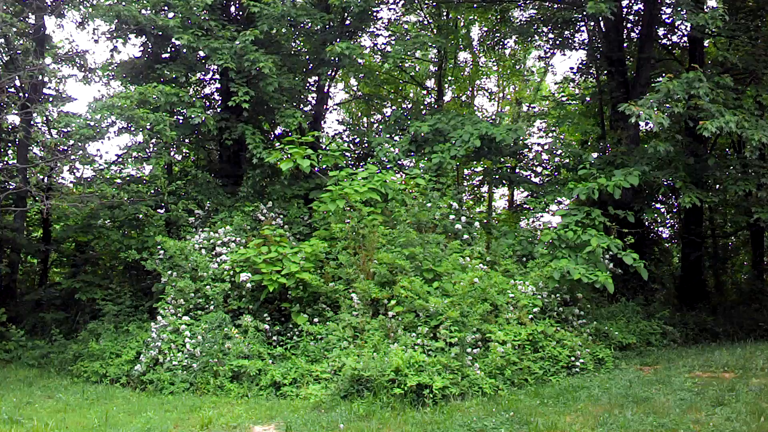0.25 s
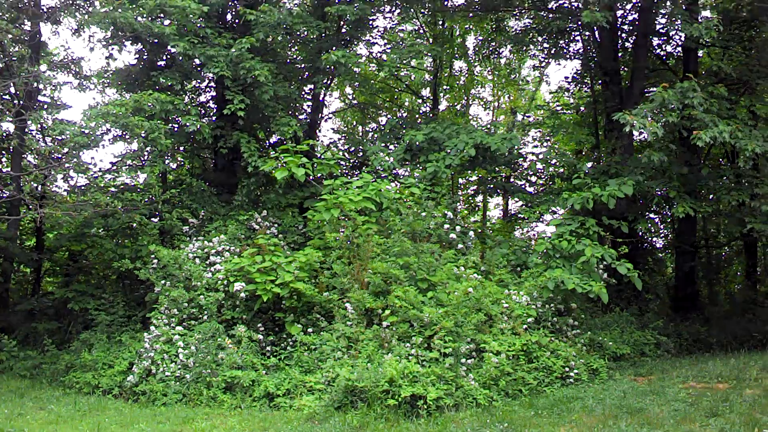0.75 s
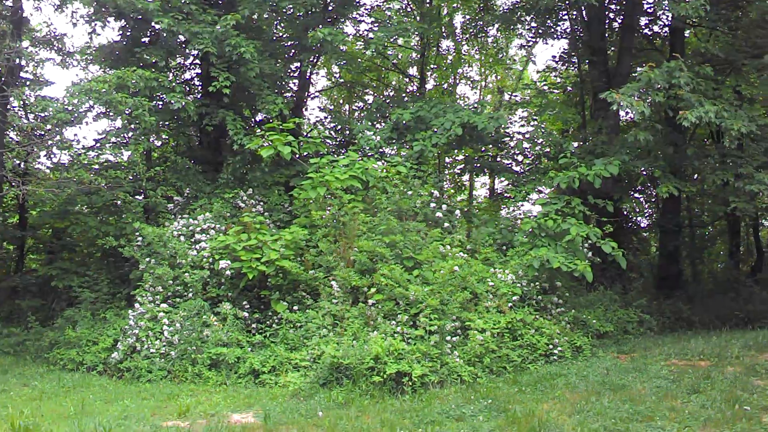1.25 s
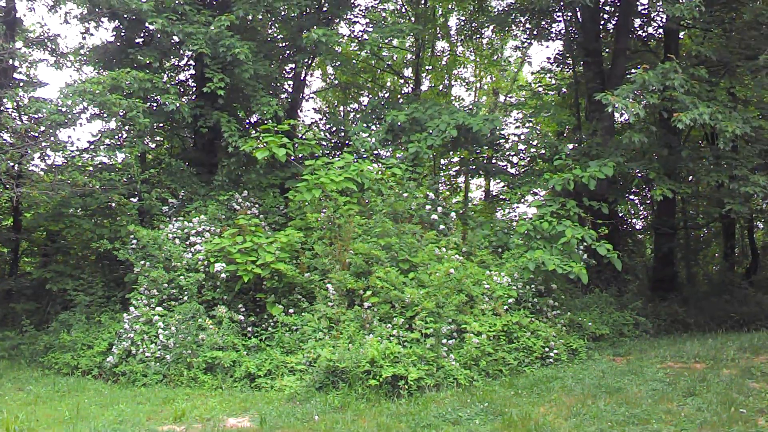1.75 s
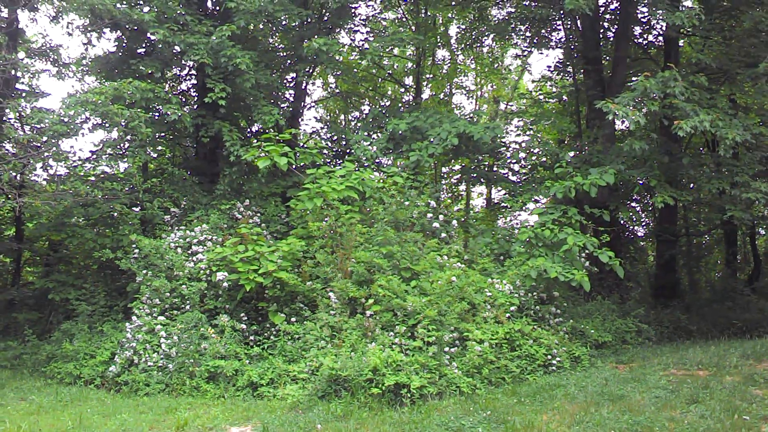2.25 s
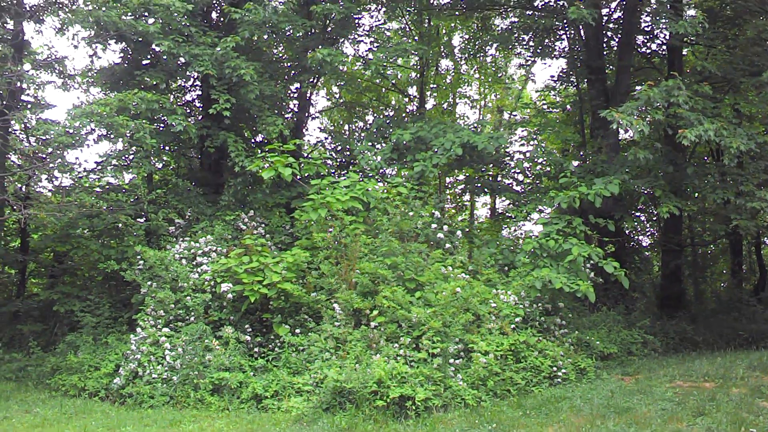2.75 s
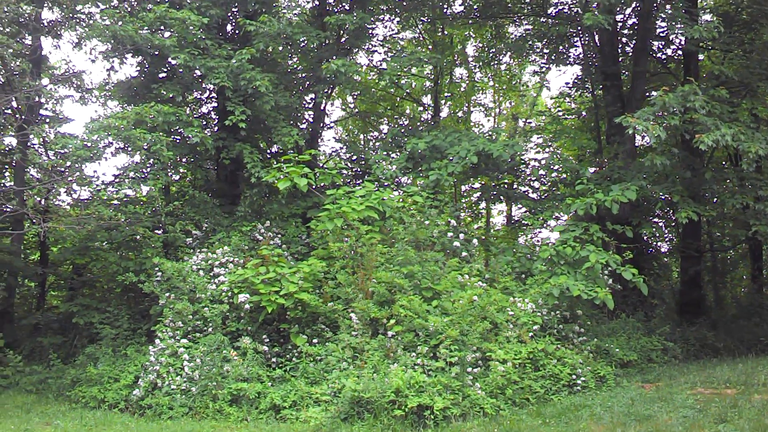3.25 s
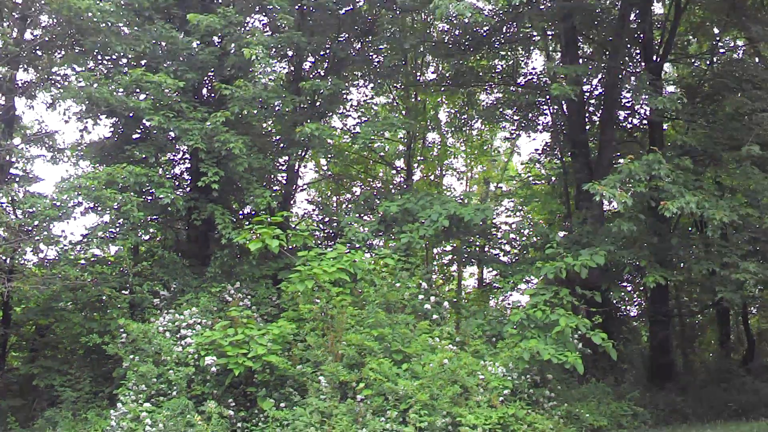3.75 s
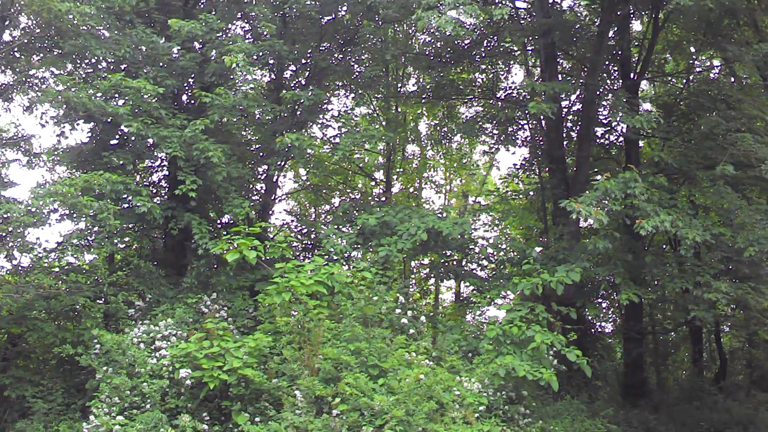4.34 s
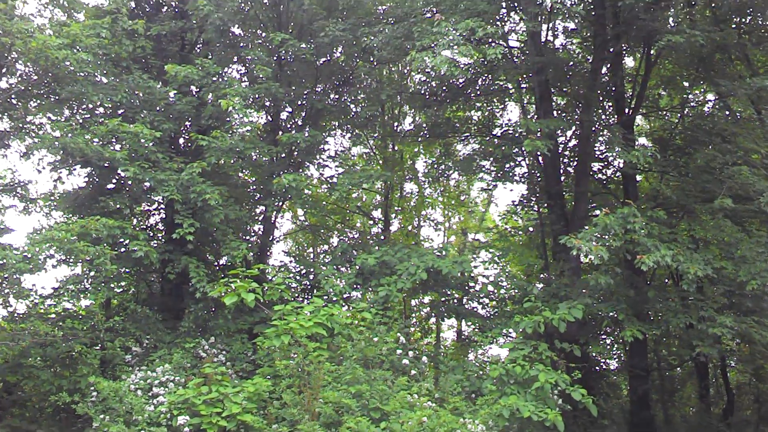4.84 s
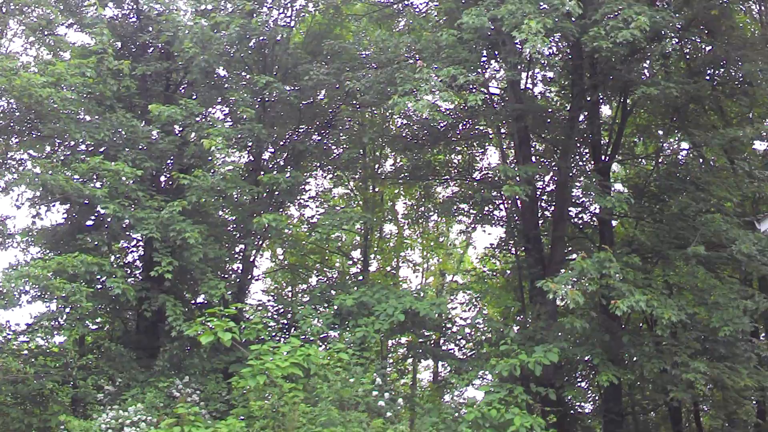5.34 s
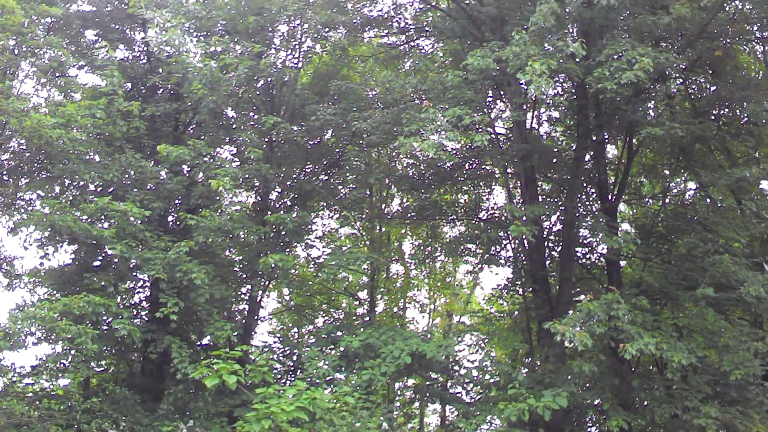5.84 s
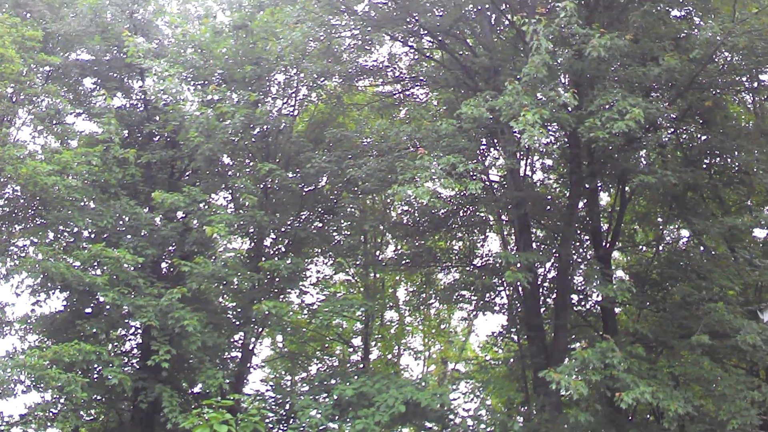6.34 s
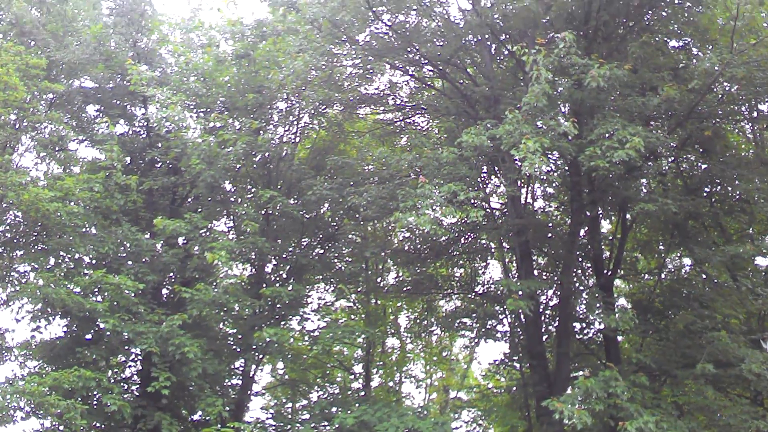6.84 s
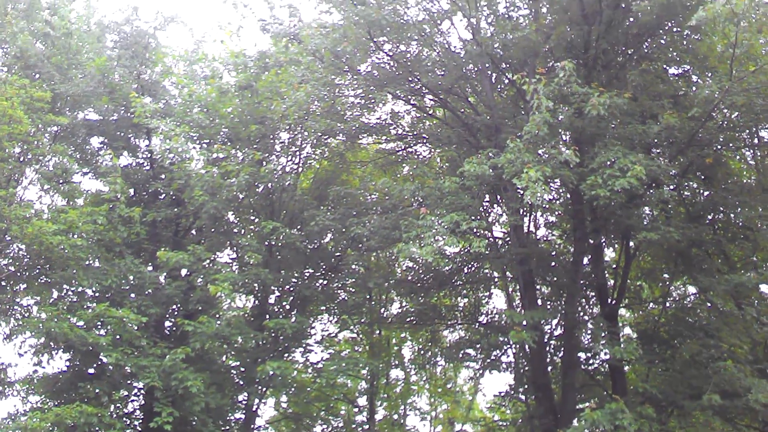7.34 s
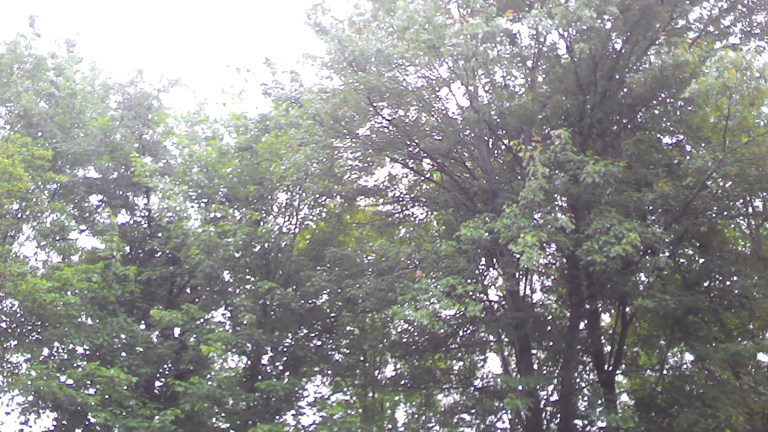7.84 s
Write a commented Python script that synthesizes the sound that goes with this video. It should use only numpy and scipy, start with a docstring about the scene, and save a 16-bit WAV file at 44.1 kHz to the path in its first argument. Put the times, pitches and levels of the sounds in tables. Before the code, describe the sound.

A dense cicada chorus hisses loudly and steadily at the edge of a wood, over faint distant engines and traffic rumble.

```python
"""The edge of a wood: hundreds of clicking cicada tymbals merge into a loud hiss.
A second kind of cicada hums beneath it. Far engines rev and fade over a traffic rumble.
Faint bird chirps, small knocks on a camera body and near slipping squeaks come through.
The sound cuts out briefly at the start and midway, and ends quieter."""
import sys
import numpy as np
from scipy import signal
from scipy.fft import rfft, irfft, next_fast_len
from scipy.io import wavfile
from scipy.ndimage import uniform_filter1d

SR = 44100
rng = np.random.default_rng(int(sys.argv[2]) if len(sys.argv) > 2 else 0)


def generate_wav(signal):
    """Clip the signal to [-1, 1] and save it as 16-bit WAV at the path in sys.argv[1]."""
    frames = np.transpose(np.atleast_2d(signal))
    scaled = np.clip(frames, -1, 1) * 32767
    pcm = np.round(scaled).astype(np.int16)
    wavfile.write(sys.argv[1], SR, pcm)


N = 356989
TIME = np.arange(N) / SR


def amp(db):
    """Decibels to gain."""
    return 10 ** (np.asarray(db) / 20)


def unit(x):
    """Scale to rms 1."""
    return x / np.sqrt(np.mean(x ** 2) + 1e-20)


def colour(x, spectrum):
    """Filter by a (frequency [Hz], level [dB]) spectrum; rms 1."""
    hz, db = np.transpose(spectrum)
    size = next_fast_len(N)
    bin_hz = np.fft.rfftfreq(size, 1 / SR)
    gain = amp(np.interp(np.log(bin_hz + 1), np.log(hz + 1), db))
    return unit(irfft(rfft(x, size) * gain, size)[:N])


def drift(t, per_s, size=1024):
    """Random wander of about unit size at times t."""
    return np.interp(t * per_s % size, np.arange(size), rng.standard_normal(size))


def add(mix, start_s, sound):
    """Mix a sound in at start_s."""
    part = mix[max(round(start_s * SR), 0):][:len(sound)]
    part += sound[:len(part)]


def echoes(x, t60_s):
    """Dense reflections from trunks and leaves; unit-energy tail."""
    t = TIME[:SR // 2]
    tail = rng.standard_normal(len(t)) * amp(-60 * t / t60_s)
    return signal.fftconvolve(x, tail / np.linalg.norm(tail))[:N]


def chorus_db(base_db=-18.5, ease_db_per_s=0.2668, wave_db=0.82, period_s=4.78, crest_s=2.37):
    """Hiss level: slow waves on a gentle decline."""
    return base_db - ease_db_per_s * TIME + wave_db * np.cos(2 * np.pi * (TIME - crest_s) / period_s)


def cicada_hiss(click_hz=299.5, swell_db=2.5, jitter=.06, insects=260, max_clicks=4000):
    """Each insect buckles its tymbals in a fast, uneven click train."""
    # ring of tymbal and abdomen: (frequency [Hz], relative density [dB])
    tymbal = [(1500, -65), (2400, -44.5), (3100, -29), (3900, -14), (4800, -10), (5500, -2), (6050, 1),
              (7200, -8.5), (8200, -11), (9800, -28.5), (11900, -34), (13500, -42), (15600, -46)]
    clicks = np.zeros(N)
    for _ in range(insects):
        gaps_s = (1 + jitter * rng.standard_normal(max_clicks)) / (click_hz * rng.uniform(.75, 1.25))
        at_s = np.cumsum(abs(gaps_s))
        strength = amp(swell_db * (drift(at_s, 0.95) + rng.standard_normal()))
        strength *= rng.choice([-1, 1], max_clicks)
        heard = at_s < TIME[-1]
        clicks[(at_s[heard] * SR).astype(int)] += strength[heard]
    return amp(chorus_db()) * colour(clicks, tymbal)


def cicada_hum(waver_hz=12, waver_share=.4, waver_per_s=30, swell_db=2.5, group_size=26):
    """Each insect holds a nearly pure, wavering note; together they blur into a drone."""
    # cicada groups: (pitch [Hz], pitch spread [Hz], level [dB])
    hummers = [(1320, 18, -58.5), (1305, 75, -53), (1129, 35, -62.5), (1442, 130, -63.5)]
    t, out = TIME[::8], np.zeros(N)
    for hz, spread_hz, db in hummers:
        group = np.zeros(len(t), complex)
        for _ in range(group_size):
            detune_hz = spread_hz * drift(t, 1.5)
            detune_hz += (waver_hz + waver_share * spread_hz) * drift(t, waver_per_s)
            swell = amp(swell_db * drift(t, 2.014))
            turns = np.cumsum(detune_hz) * t[1] + rng.random()
            group += swell * np.exp(2j * np.pi * turns)
        carrier = np.exp(2j * np.pi * hz * TIME)
        out += amp(db) * unit((np.interp(TIME, t, group) * carrier).real)
    return out


def rumble(level_db=-44.5, swell_db=1.):
    """Soft, low noise of far traffic."""
    # traffic and air: (frequency [Hz], relative density [dB])
    air = [(10, -23.5), (25, -13.5), (42, 1), (60, 2.5), (90, -3), (125, -3.5), (160, -11), (230, -14.5),
           (320, -21.5), (500, -25.5), (950, -24.5), (1900, -30.5), (2500, -31), (5000, -55)]
    return amp(level_db + swell_db * drift(TIME, 7)) * colour(rng.standard_normal(N), air)


def engines(idle_hz=100.2, rev_curve=1.6, waver=0.0048, flutter_db=1.2,
            rise_s=0.085, fall_s=0.32, idle_db=-10.5, fade_db_per_s=3.5):
    """Far engines rev up and down once; load sets the level, the long air path adds flutter."""
    # revs: (load on [s], load off [s], level [dB], peak [s], peak firing rate [Hz], sag 1 s away [Hz])
    revs = [(3.45, 7.42, -43.5, 5.6, 130, 7.6), (.5, 3.1, -53, 2.6, 137.5, 4.5)]
    # engine orders: (multiple of firing rate [1], relative level [dB])
    orders = [(2 / 3, -11.5), (0.99, 0), (1.5, -25), (2, -19), (1.9, -19.5), (2.35, -23)]
    out = np.zeros(N)
    for on_s, off_s, db, peak_s, peak_hz, sag_hz in revs:
        firing_hz = np.maximum(peak_hz - sag_hz * abs(TIME - peak_s) ** rev_curve, idle_hz)
        load = np.interp(TIME, [on_s, on_s + rise_s, off_s, off_s + fall_s], [0, 1, 1, 0])
        idle_s = abs(TIME - np.clip(TIME, on_s, off_s))
        tone = np.zeros(N)
        for order, order_db in orders:
            turns = order * np.cumsum(firing_hz * (1 + waver * drift(TIME, 15))) / SR
            tone += amp(order_db + flutter_db * drift(TIME, 6.9)) * np.sin(2 * np.pi * turns)
        out += amp(db + idle_db * (1 - load) - fade_db_per_s * idle_s) * unit(tone)
    return out


def chirps(length_s=0.0602, fall_share=.16, waver=.03, direct_db=-3, wet_db=-1.0):
    """Short falling bird notes deep in the wood, blurred by echo."""
    # notes: (time [s], start pitch [Hz], level before direct and wet gains [dB])
    notes = [(1.895, 1213, -54), (1.945, 2310, -59), (1.975, 1890, -61), (1.99, 2350, -61),
             (3.58, 2480, -58), (3.95, 2420, -66), (4.355, 2460, -60), (4.775, 2470, -58.5),
             (5.2, 2410, -57)]
    out, t = np.zeros(N), TIME[:int(length_s * SR)]
    for start_s, start_hz, db in notes:
        hz = start_hz * (1 - fall_share * t / length_s) * (1 + waver * drift(t, 308))
        tone = np.sin(2 * np.pi * np.cumsum(hz) / SR)
        add(out, start_s, amp(db) * unit(tone * np.hanning(len(t))))
    return amp(direct_db) * out + amp(wet_db) * echoes(out, t60_s=.38)


def knocks(body_hz=364, width_hz=73, boost_db=9.5, size=4096):
    """Dull or bright bursts through one resonance of the camera body."""
    # knocks: (time [s], onset level [dB], treble roll-off [Hz], decay [s])
    hits = [(3.063, -47, 1100, .007), (3.106, -45, 1900, 0.01), (3.525, -45.5, 1200, 0.037),
            (4.505, -37, 2800, 0.0022), (5.143, -47, 1800, .009), (6.918, -30, 8000, .0007),
            (6.928, -29, 30000, .0007), (7.089, -46, 2800, 0.0065), (7.184, -43, 1400, .004)]
    out, bin_hz = np.zeros(N), np.fft.rfftfreq(size, 1 / SR)
    body = amp(boost_db * np.exp(-((bin_hz - body_hz) / width_hz) ** 2))
    for start_s, db, rolloff_hz, decay_s in hits:
        rolloff = np.exp(-(bin_hz / rolloff_hz) ** 2)
        burst = irfft(rfft(rng.standard_normal(size)) * body * rolloff)
        add(out, start_s, amp(db) * unit(burst) * np.exp(-TIME[:size] / decay_s))
    return out


def squeaks(jitter=0.051, wet_db=-6):
    """Uneven, slowing slips, coloured by one broad resonance per squeak."""
    # slips: (time [s], length [s], start rate [Hz], end rate [Hz], centre [Hz], width [Hz], level [dB])
    slips = [(6.972, 0.049, 400, 320, 600, 250, -53.5), (6.968, 0.0395, 400, 320, 1300, 450, -53),
             (7.108, 0.042, 480, 355, 1520, 530, -46)]
    out = np.zeros(N)
    for start_s, length_s, start_hz, end_hz, centre_hz, width_hz, db in slips:
        t = TIME[:int(length_s * SR)]
        slip_hz = np.linspace(start_hz, end_hz, len(t)) * (1 + jitter * drift(t, 496))
        turns = np.cumsum(slip_hz) / SR
        tone = np.zeros(len(t))
        for harmonic in range(1, 8):
            resonance = np.exp(-((harmonic * slip_hz - centre_hz) / width_hz) ** 2)
            tone += resonance * np.cos(2 * np.pi * harmonic * turns)
        add(out, start_s, amp(db) * unit(tone * np.hanning(len(t))))
    return out + amp(wet_db) * echoes(out, t60_s=.2)


def scene():
    """All sources at one microphone, alike in both channels."""
    cicadas = cicada_hiss() + cicada_hum()
    traffic = engines() + rumble()
    return np.tile(cicadas + traffic + chirps() + squeaks() + knocks(), (2, 1))


def record(dry, cutoff_hz=15800):
    """Abrupt level drops, then a low-pass."""
    # drops: (start [s], end [s], gain [dB])
    drops = [(-1, .0465, -70), (.0788, .267, -70), (4.512, 4.6238, -65), (7.824, 9, -11.5)]
    gain = np.ones(N)
    for start_s, end_s, db in drops:
        gain[(TIME >= start_s) & (TIME < end_s)] = amp(db)
    gated = dry * uniform_filter1d(gain, size=40)
    lowpass = signal.firwin(511, cutoff_hz, window=("kaiser", 9), fs=SR)
    return signal.oaconvolve(gated, lowpass[None], "same", axes=1)


dry = scene()
out = record(dry)
generate_wav(out)
```